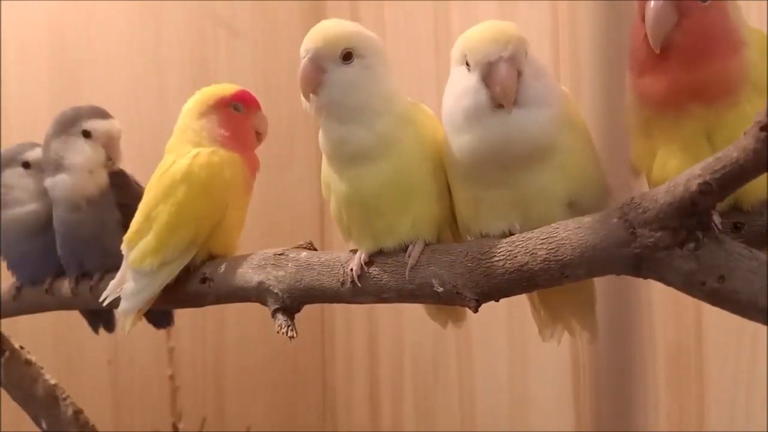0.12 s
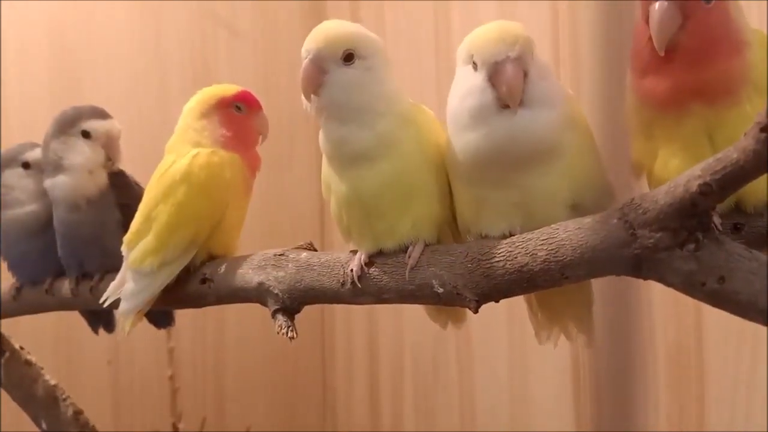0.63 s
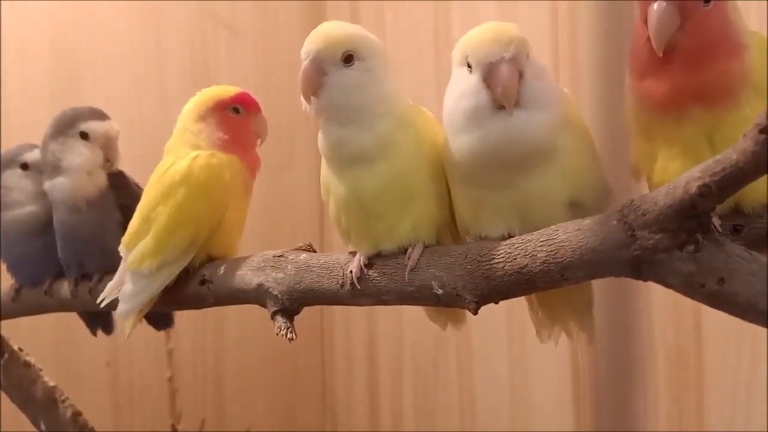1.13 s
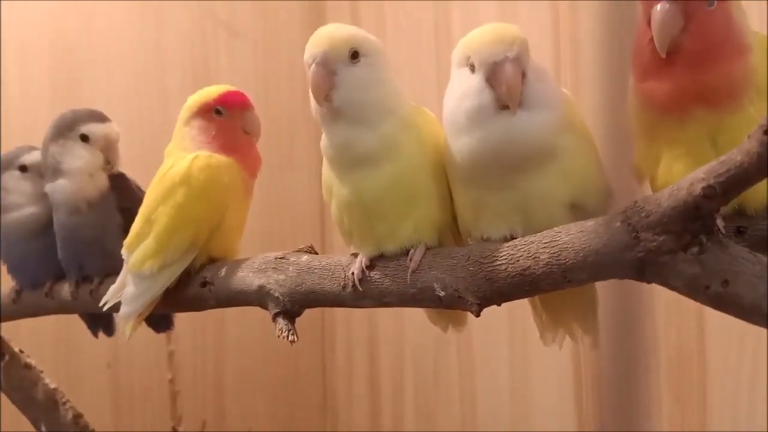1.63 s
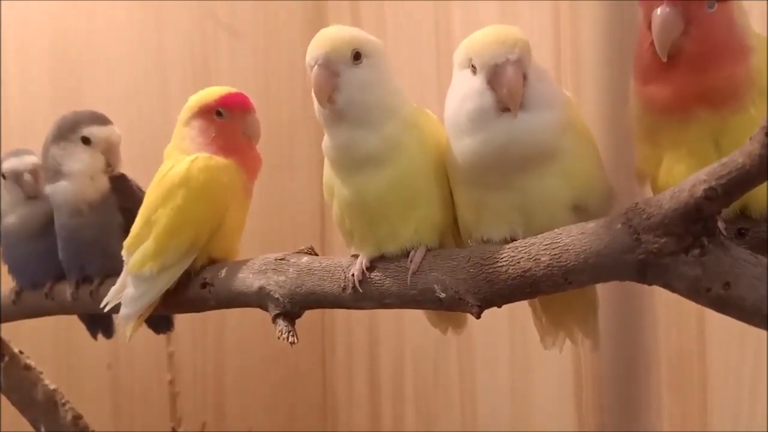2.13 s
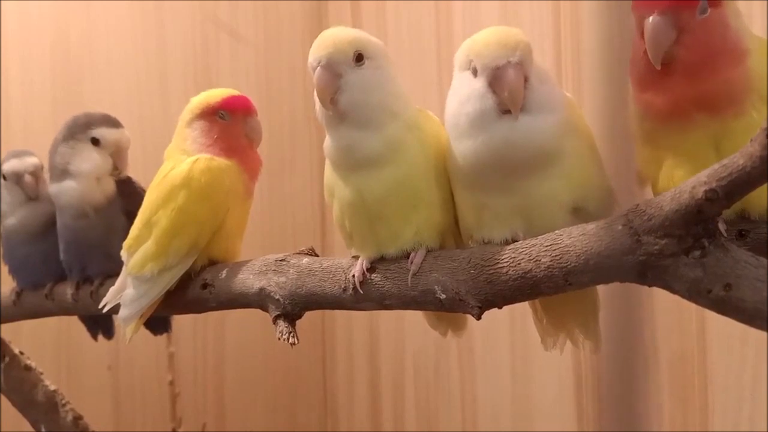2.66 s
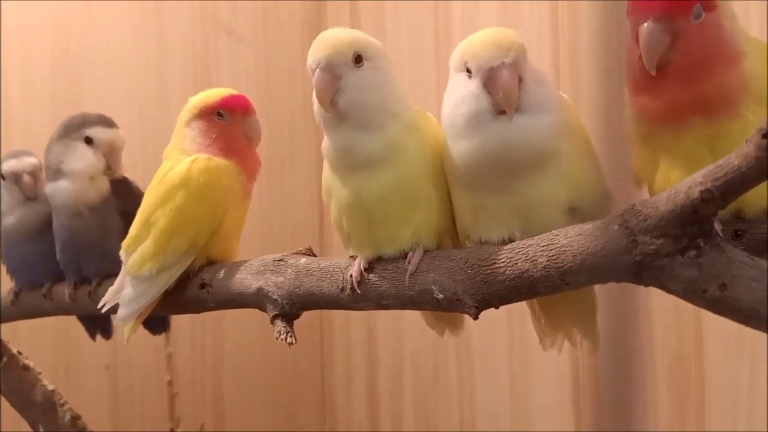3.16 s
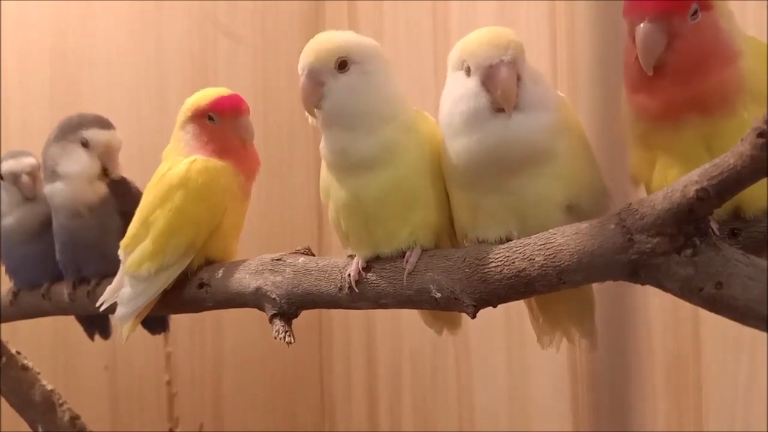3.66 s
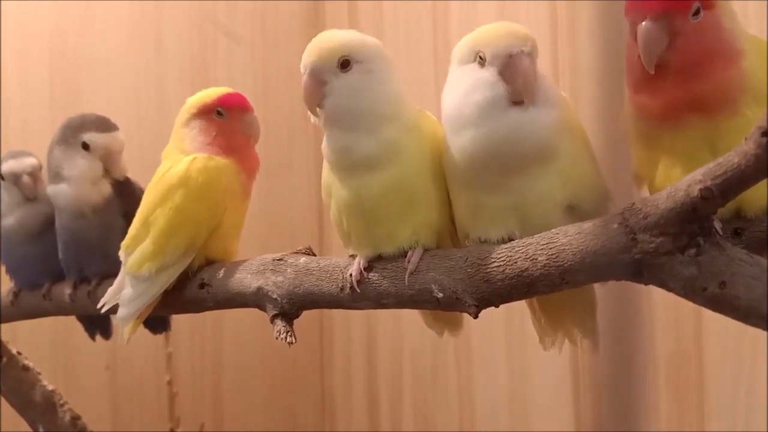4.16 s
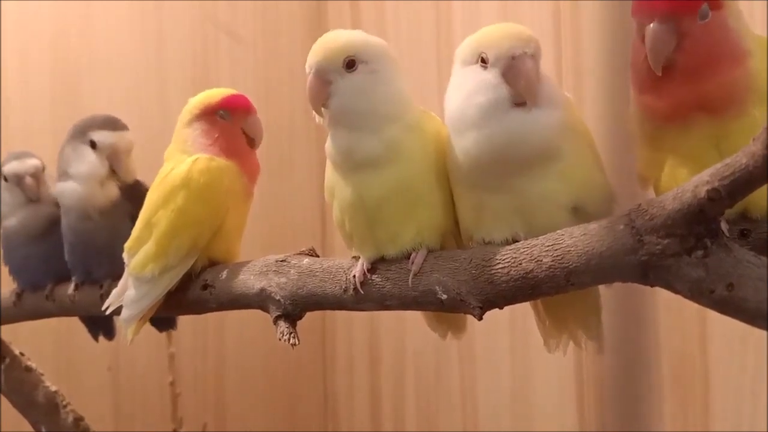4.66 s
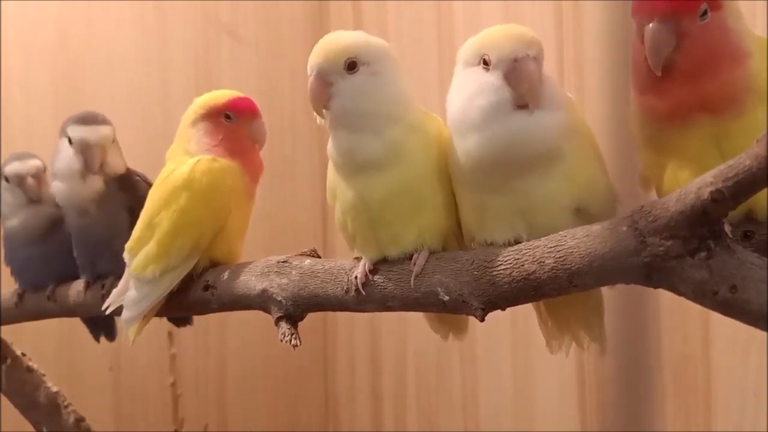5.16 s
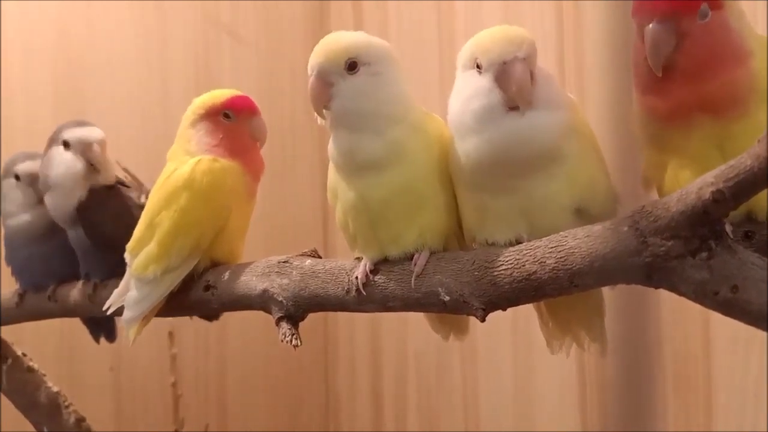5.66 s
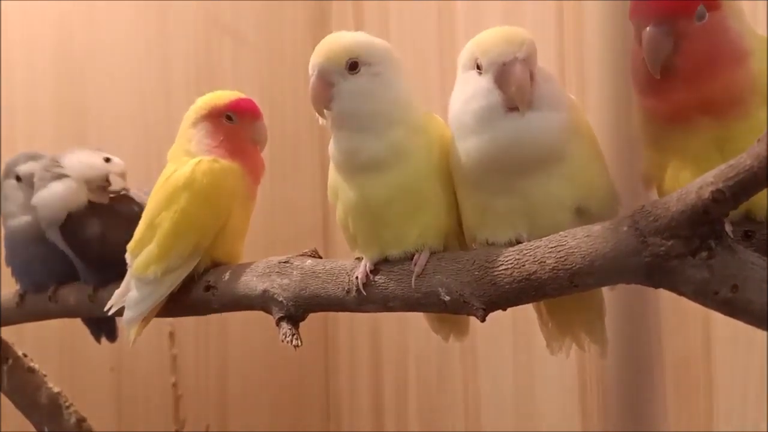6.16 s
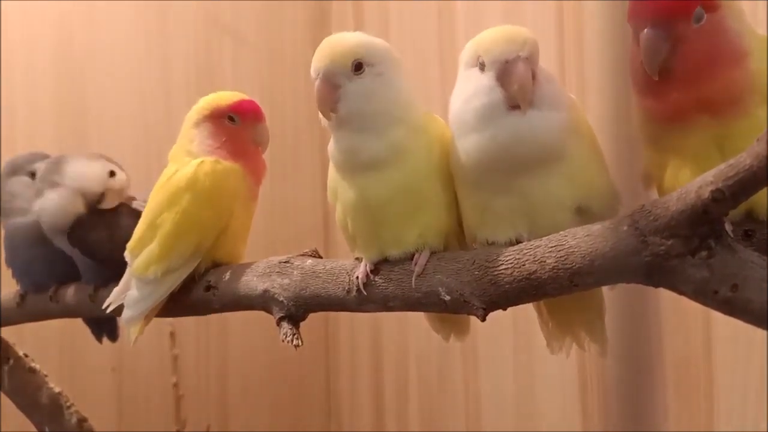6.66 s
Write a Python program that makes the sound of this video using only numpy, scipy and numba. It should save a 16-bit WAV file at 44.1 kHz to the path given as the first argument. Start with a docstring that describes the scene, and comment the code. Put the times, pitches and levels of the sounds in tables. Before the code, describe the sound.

An indoor aviary with short, lively echoes, low hum, soft hiss and blurred distant bird chatter throughout; a very faint insect-like buzz throbs high up. At 0 s a far rooster's rough crow is ending, dropping away by 0.5 s. Around 0.9 s a small parrot close on the left begins very quietly; from 1.2 to 2.4 s its clipped chirps grow louder and closer together. From 2.4 to 5.4 s it chatters rapidly, about eight syllables a second, mixing steep falling swoops, paired notes, rises and short harsh squawks. Thin, high gliding whistles answer faintly at the right, mostly 2.9-5.2 s, with a tiny feather rustle near 4.2 s. Faint rooster tones linger behind. The chatter thins and stops at about 5.9 s. A new distant crow comes in three syllables from 5.5 to 6.3 s, then other hoarse, fainter crows continue to the end near 6.8 s.

```python
"""An echoing aviary: a songbird close on the left pours out short falling and rising near-sine notes.
A thinner bird whistles higher up in gliding tones; roosters crow further off as stacks of shaken partials.
Filtered noise makes a brief rustle of feathers and a throbbing insect; random chirps make a far flock.
Shaped noise is the background: low hum, blurred far bird chatter near 2 kHz, and hiss.
Early echoes and a network of delay lines give the room."""
import sys
import numpy as np
from scipy import signal
from scipy.fft import rfft, irfft, next_fast_len
from scipy.io import wavfile
from scipy.ndimage import uniform_filter1d
from numba import njit

SR = 44100
rng = np.random.default_rng(int(sys.argv[2]) if len(sys.argv) > 2 else 0)


def ratio_of_db(decibels):
    """Turn decibels (scalar or array-like) into linear amplitude factors; 0 dB maps to 1."""
    return 10 ** (np.asarray(decibels, float) / 20)


def log_audio(samples):
    """Write samples as a 16-bit WAV file to the path given in sys.argv[1]."""
    # one column per channel
    frames = np.atleast_2d(samples).T
    # limit to full scale, then quantise
    limited = np.clip(frames, -1, 1)
    pcm = np.round(limited * 32767).astype(np.int16)
    wavfile.write(sys.argv[1], SR, pcm)


N = 299880


def unit(x):
    """Normalization: scale to an rms of 1."""
    return x / np.sqrt(np.mean(x ** 2))


def band(x, lo_hz, hi_hz):
    """Band limitation by a steep band-pass filter."""
    return signal.sosfilt(signal.butter(3, [lo_hz, hi_hz], "band", fs=SR, output="sos"), x)


def walk(rate_hz):
    """Low-passed noise: smooth chance of rms 1 that changes about rate_hz times a second."""
    width = int(SR / rate_hz)
    once = uniform_filter1d(rng.standard_normal(N), width)
    return unit(uniform_filter1d(once, width))


def notes(table, settle, attack, trill_hz=0., swing_hz=0., flutter_db=0., reach=0.98, sag_hz_per_s=0.):
    """Frequency modulation: near-sines glide quickly, then settle; a fast trill adds harsh sidebands.

    Rows: start_s, length_s, first_hz, last_hz, level_db; settle, attack and reach are relative times."""
    out = np.zeros(N + SR)
    starts = rng.uniform(0, 2 * np.pi, (len(table), 2))
    for (start_s, length_s, first_hz, last_hz, level_db), (tone_start, trill_start) in zip(table, starts):
        t = np.arange(int(length_s * SR)) / SR
        u = t / length_s
        glide = (1 - np.exp(-np.minimum(u / reach, 1) / settle)) / (1 - np.exp(-1 / settle))
        trill = swing_hz * np.sin(2 * np.pi * trill_hz * t + trill_start)
        pitch_hz = first_hz + (last_hz - first_hz) * glide - sag_hz_per_s * t + trill
        phase = tone_start + 2 * np.pi * np.cumsum(pitch_hz) / SR
        shape = np.sin(np.pi / 2 * np.clip(np.minimum(u / attack, (1 - u) / 0.17), 0, 1))
        # the octave grows as the glide settles
        octave = ratio_of_db(-36.5) * glide ** 2 * np.sin(2 * phase)
        i = int(start_s * SR)
        out[i:i + len(t)] += np.sqrt(2) * ratio_of_db(level_db) * shape * (np.sin(phase) + octave)
    if flutter_db:
        return out[:N] * ratio_of_db(flutter_db * walk(100))
    return out[:N]


def songbird():
    """Scaled contours: each syllable's pitch ratios multiply its key, in plain, steep or trilled notes."""
    # the song: start_s, syllable, key_hz, level_db
    song_rows = [(.735, "squawk", 2135, -74), (.91, "squawk", 2180, -56), (1.02, "short fall", 2045, -60),
                 (1.1, "short fall", 1580, -58), (1.186, "swoop", 1974, -45.5),
                 (1.415, "long pair", 1650, -44), (1.542, "fall", 1720, -36),
                 (1.725, "short fall", 1968, -49.5), (1.924, "rise", 2037, -34),
                 (2.023, "drop", 1544, -35.5), (2.139, "squawk", 2012, -32.5),
                 (2.364, "short pair", 1677, -36.5), (2.448, "swoop", 2008, -29),
                 (2.586, "stairs", 1822, -34), (2.742, "low stairs", 1350, -41),
                 (2.821, "short fall", 1703, -32), (2.914, "turn", 1916, -29.5),
                 (3.044, "drop", 1443, -30.5), (3.132, "squawk", 2027, -23),
                 (3.265, "long pair", 1648, -26), (3.383, "fall", 1805, -26.5),
                 (3.518, "short pair", 1688, -31), (3.6, "swoop", 1986, -26),
                 (3.734, "stairs", 1808, -30.5), (3.88, "fall", 1707, -28), (3.941, "climb", 1761, -32),
                 (4.042, "short pair", 1740, -29), (4.121, "swoop", 1947, -26),
                 (4.282, "long pair", 1649, -28), (4.398, "fall", 1742, -29),
                 (4.572, "short pair", 1708, -28.5), (4.652, "swoop", 1964, -25.5),
                 (4.81, "stairs", 1824, -33.5), (4.958, "low stairs", 1370, -38.5),
                 (5.037, "rise", 1984, -28.5), (5.131, "turn", 1849, -29.5), (5.283, "drop", 1445, -33.5),
                 (5.376, "squawk", 2032, -25), (5.462, "climb", 1734, -33), (5.59, "squawk", 2017, -42),
                 (5.687, "level", 1906, -24.5), (5.901, "squawk", 1945, -29)]
    # notes of each syllable: voice, after_s, length_s, first_ratio, last_ratio (times the key), step_db
    contours = { "swoop": [("steep", 0, .033, 1.34, .99, 0), ("plain", .038, .024, 1, 1.02, -1)],
                "squawk": [("harsh", 0, 0.031, 1.15, 1, 0)], "fall": [("plain", 0, .031, 1.3, 1, 0),
                ("harsh", .041, .012, 1.2, .74, -12)], "drop": [("plain", 0, .019, 1.29, 1, 0),
                ("harsh", .021, .012, 1.28, .9, -7)], "short fall": [("plain", 0, .027, 1.17, 1, 0),
                ("harsh", .034, .012, 1.1, .76, -12)], "level": [("plain", 0, 0.026, 1.03, 0.98, 0)],
                "rise": [("plain", 0, .017, .85, 1, 0), ("plain", .021, .013, .9, .8, -7)],
                "short pair": [("plain", 0, .021, 1.09, 1, 0), ("plain", .029, .017, .84, .92, -4)],
                "long pair": [("plain", 0, .023, 1.13, 1, 0), ("plain", .036, .037, .77, .9, -5)],
                "stairs": [("plain", 0, .012, 1.07, 1, 0), ("plain", .018, .032, .95, .78, -1)],
                "low stairs": [("plain", 0, .018, 1.36, 1.04, 0), ("plain", .02, .022, 1, .94, 0)],
                "turn": [("plain", 0, .016, .72, .72, -12), ("plain", .021, .025, 1.04, 1, 0),
                ("plain", .047, .015, .87, .83, -1.5)], "climb": [("plain", 0, .025, .8, .77, -4),
                ("plain", .035, .027, .94, 1, 0)], }
    voices = {"plain": [], "steep": [], "harsh": []}
    for start_s, name, key_hz, level_db in song_rows:
        for voice, after_s, length_s, first_ratio, last_ratio, step_db in contours[name]:
            note = (start_s + after_s, length_s, first_ratio * key_hz, last_ratio * key_hz, level_db + step_db)
            voices[voice].append(note)
    harsh = notes(voices["harsh"], 1.0, 0.13, trill_hz=191.6, swing_hz=160.0, flutter_db=-4.0)
    plain = notes(voices["plain"], 0.432, 0.25, flutter_db=3.0)
    steep = notes(voices["steep"], 0.411, 0.2)
    return plain + steep + harsh


def overtones(song, tone_db, hiss_db):
    """Phase multiplication: the song's envelope carries its fifth and sixth multiples and some hiss."""
    analytic = signal.hilbert(song)
    multiples = sum(np.cos(k * np.angle(analytic)) for k in range(5, 7))
    high = ratio_of_db(tone_db) * multiples + ratio_of_db(hiss_db) * rng.standard_normal(N)
    return band(np.abs(analytic) * high, 5400.0, 13000.0)


def whistler():
    """Exponential approach: whistles near their pitch in a fixed time and sag a little; slides climb."""
    # whistles: start_s, length_s, first_hz, held_hz (before the sag), level_db (before the flutter)
    whistle_rows = [(0.54, 0.029, 4530, 4650, -77), (0.793, 0.07, 3590, 3624, -81),
                    (0.96, 0.021, 4800, 4800, -81), (1.273, 0.054, 3640, 3805, -69.5),
                    (1.343, 0.028, 4700, 4570, -83), (1.692, 0.065, 4450, 4840, -76.5),
                    (2.875, 0.043, 4840, 4524, -60), (3.047, 0.088, 5080, 4596, -69),
                    (3.257, 0.046, 5640, 5326, -70), (3.546, 0.26, 4450, 4710, -64.5),
                    (3.783, 0.091, 4920, 5250, -75), (3.974, 0.062, 5350, 5205, -70),
                    (4.257, 0.045, 4550, 3970, -61.5), (4.305, 0.034, 4510, 4580, -65.5),
                    (4.429, 0.073, 3980, 3815, -54.5), (4.469, 0.075, 4320, 4480, -60),
                    (4.596, 0.054, 4740, 4802, -56.5), (4.786, 0.06, 4730, 4716, -62),
                    (5.82, 0.023, 4730, 4540, -72), (6.576, 0.049, 3630, 3860, -71.5)]
    # rising slides: start_s, length_s, top_hz, level_db (before the flutter)
    slide_rows = [(1.03, 0.1, 2920, -70), (4.147, 0.105, 3210, -56.5), (4.319, 0.11, 3083, -55),
                  (4.919, 0.11, 3710, -56), (5.1, 0.13, 3670, -55.5)]
    settle_s, slide_from_hz = 0.00886, 1500
    held = sum(notes([row], settle_s / row[1], 0.02, sag_hz_per_s=271) for row in whistle_rows)
    slides = [(start_s, length_s, slide_from_hz, top_hz, level_db)
              for start_s, length_s, top_hz, level_db in slide_rows]
    climbing = notes(slides, 1.76, 0.17, flutter_db=3.5, reach=0.86)
    return held * ratio_of_db(8.6 * np.minimum(walk(110), 1)) + climbing


def crow_syllable(start_s, length_s, top_hz, level_db):
    """Voice contour: a rough scoop up, an arched top that sags and fades, then a hoarse drop.

    Returns rows of start_s, pitch_hz, level_db, roughness."""
    scoop_hz, scoop_s, scoop_db, scoop_rough = 564, 0.029, -10.5, 0.7
    arch_s, arch_hz = 0.0725, 54.5
    sag_hz_per_s, fade_db_per_s, clear_rough = 180, -12.5, 0.35
    drop_s, drop_hz, drop_db, spent_rough = 0.038, -150, -11, 1
    hold_s = length_s - drop_s
    low_hz = top_hz - sag_hz_per_s * length_s
    low_db = level_db + fade_db_per_s * hold_s
    return [(start_s, scoop_hz, level_db + scoop_db, scoop_rough),
            (start_s + scoop_s, top_hz - arch_hz, level_db, clear_rough),
            (start_s + arch_s, top_hz, level_db, clear_rough),
            (start_s + hold_s, low_hz, low_db, clear_rough),
            (start_s + length_s, low_hz + drop_hz, low_db + drop_db, spent_rough)]


def crow(syllables, voice_db, breath_db):
    """Additive synthesis: roughness shakes the pitch, flutters each partial and adds breath noise."""
    t = np.arange(N) / SR
    knot_s, *columns = np.transpose(np.concatenate(syllables))
    pitch_hz, level_db, rough, *half_db = (np.interp(t, knot_s, column) for column in columns)
    sounding = sum((t >= rows[0][0] - .01) & (t < rows[-1][0]) for rows in syllables).clip(0, 1)
    shake = 1 + .004 * walk(30) + .014 * rough * walk(250)
    phase = 2 * np.pi * np.cumsum(pitch_hz * shake) / SR

    def flutter_db():
        return 3.2 * walk(26.4) + 12.9 * rough * np.minimum(walk(287), 1)

    # far under its top pitch the voice loses its overtones
    slack_db = -70 * np.maximum(.87 - pitch_hz / pitch_hz.max(), 0)
    stack = sum(ratio_of_db(partial_db + k * slack_db + flutter_db()) * np.sin((k + 1) * phase)
                for k, partial_db in enumerate(voice_db))
    if half_db:  # strong and weak cycles alternate: partials appear half-way between
        between_db = (np.array(voice_db[1:]) + voice_db[:-1]) / 2
        stack += sum(ratio_of_db(partial_db + half_db[0] + flutter_db()) * np.sin((k + 1.5) * phase)
                     for k, partial_db in enumerate(between_db))
    breath = rough * ratio_of_db(breath_db) * unit(band(rng.standard_normal(N), 300.0, 2300.0))
    return (stack + breath) * ratio_of_db(level_db) * uniform_filter1d(1. * sounding, size=600)


def roosters():
    """Harmonic spectra: five voices differ in contour, partial levels and breath."""
    # contours, one table a stretch: start_s, pitch_hz, level_db, roughness (0-1)
    shrill_crow, far_crow = [
        [(0, 746, -57.5, 0.94), (.25, 740.5, -60.5, 0.74), (.52, 738, -68, 0.49)],
        [(5.5, 699.2, -60.5, 0.617), (5.95, 722.2, -61, 0.46), (6.2, 716.3, -50, 0.41), (6.4, 717, -82, 0.82)],
        [(6.46, 677, -59, 0.48), (6.62, 681, -56, 0.41), (6.8, 692.7, -53.5, 0.57)],
    ], [
        [(3.25, 676, -62.5, 0.4), (3.55, 667.4, -66.5, 0.74)],
        [(3.6, 743.7, -60, 0.49), (4.25, 735.3, -64, 0.7), (4.9, 679, -65.5, 0.59)],
    ]
    # broken voices, the same with one more column: half_db (partials half-way between)
    end_crow, hoarse_crow = [
        [(0, 782, -53, 0.55, -2), (.14, 769.2, -50.5, 0.69, -8), (.25, 715.7, -50.5, 0.02, 3),
         (.44, 685, -50.5, 0.42, -1), (.495, 530, -42.5, 0.34, -19)],
    ], [
        [(0, 479, -45, 0.44, -17), (.17, 459.6, -56, 0.3, -7)],
        [(6.38, 600.2, -59.5, 0.79, -7), (6.55, 552, -56, 0.58, -9.5), (6.61, 544.2, -59, 0.88, 11),
         (6.68, 534.3, -54.5, 0.53, 11), (6.8, 547.3, -49.5, 0.21, -4)],
    ]
    # a fresh crow, one row a syllable: start_s, length_s, top_hz, level_db
    new_crow = [(5.459, 0.18, 746.3, -47), (5.709, .19, 813.3, -41), (5.922, .36, 789.3, -42.5)]
    # partial_db at 1, 2, 3 .. times the pitch, before flutter and slack
    end_voice, new_voice = [4, -0.5, 10, -16, -37, -33, -40, -58, -35, -29, -22.5], [0, 4.45, -31]
    shrill_voice, hoarse_voice = [0.5, 10, -8, 0.5, -19.5, -28, -20, -17.5, -18], [-1.5, -1, -1, -15]
    return [crow(end_crow, end_voice, -2.4),
            crow([crow_syllable(*row) for row in new_crow], new_voice, -13.5),
            crow(shrill_crow, shrill_voice, -17.0),
            crow(hoarse_crow, hoarse_voice, -10),
            crow(far_crow, [0], -27)]


def rustle():
    """Amplitude-modulated noise: feathers give a bright grainy band that swells and dies."""
    # one rustle: start_s, length_s, level_db (before swell and grain)
    start_s, length_s, level_db = (4.23, .11, -64)
    u = np.clip((np.arange(N) / SR - start_s) / length_s, 0, 1)
    noise = unit(band(rng.standard_normal((2, N)), 4600.0, 9900.0))
    return noise * np.sin(np.pi * u) * ratio_of_db(level_db + 3.9 * walk(150))


def insect(throb_hz, pulse_hz, level_db):
    """Amplitude modulation: wing strokes ring a band near 7 kHz in steady throbs of a few pulses."""
    t = np.arange(N) / SR
    throb = (.5 + .5 * np.cos(2 * np.pi * throb_hz * (t - .96) + .3 * walk(2))) ** 0.5
    pulses = 1 + 0.38 * np.cos(2 * np.pi * pulse_hz * t + 2 * walk(20))
    ring = band(rng.standard_normal((2, N)), 6700.0, 7550.0)
    return unit(ring) * throb * pulses * ratio_of_db(level_db)


def flock(count, level_db, spread_db):
    """Random superposition: short trilled chirps at chance moments, pitches and levels."""
    r = rng.uniform(0.0012, 1, (count, 5))
    start_s = r[:, 0] * N / SR
    length_s = 0.0173 + 0.0065 * r[:, 1]
    first_hz = 1750 + 800 * r[:, 2]
    last_hz = first_hz * (0.9 + 0.318 * r[:, 3])
    chirp_db = level_db - spread_db * r[:, 4]
    table = np.transpose([start_s, length_s, first_hz, last_hz, chirp_db])
    return notes(table, .5, .4, trill_hz=170., swing_hz=260.)


def background():
    """Partly coherent noise: low hum, blurred far bird chatter near 2 kHz, and hiss; most alike in the bass."""
    # spectrum of the background: frequency_hz, density_db (relative, per Hz)
    spectrum = np.transpose([(26, -48), (45, -12), (300, -5), (1200, -15.5), (2040, -3), (4240, -26.5),
                             (7230, -30.5), (9680, -35.5), (13600, -42), (15000, -51)])
    # left-right likeness: frequency_hz, correlation (0-1)
    likeness = np.transpose([(30, 0.4), (100, 1), (400, 0.52), (2000, 0.016)])
    log_hz = np.log(np.fft.rfftfreq(N, 1 / SR) + 1)
    like = np.clip(np.interp(log_hz, np.log(likeness[0]), likeness[1]), 0, 1)
    colour = ratio_of_db(np.interp(log_hz, np.log(spectrum[0]), spectrum[1]))
    mid, side = rfft(rng.standard_normal((2, N))) * colour * np.sqrt([1 + like, 1 - like])
    return unit(irfft(np.array([mid + side, mid - side]), N)) * ratio_of_db(-53)


def place(x, pan_db, lead_s):
    """Level and time differences: the left microphone is pan_db louder and lead_s earlier."""
    size = next_fast_len(N + 4096)
    turn = np.exp(1j * np.pi * np.fft.rfftfreq(size, 1 / SR) * lead_s)
    shifted = irfft(rfft(x, size) * np.array([turn, 1 / turn]), size)[:, :N]
    return ratio_of_db([[pan_db / 2], [-pan_db / 2]]) * shifted


def early_echoes(direct):
    """Discrete reflections: delayed copies of the near birds with a level for each side."""
    # echoes: delay_s, left_db, right_db
    reflections = [(.0034, -8, -9.5), (.0052, -8.5, -1), (.0113, -8.5, -2.5)]
    return sum(ratio_of_db([[left_db], [right_db]]) * np.roll(direct, int(delay_s * SR), axis=1)
               for delay_s, left_db, right_db in reflections)


@njit
def walls(x, lags, gain, damp):
    """Feedback delay network: eight lines feed each other, duller on every round."""
    line, soft, out = np.zeros((8, 4096)), np.zeros(8), np.zeros((2, len(x)))
    for i in range(len(x)):
        total = 0.
        for k in range(8):
            soft[k] += (1 - damp) * (gain[k] * line[k, (i - lags[k]) & 4095] - soft[k])
            total += soft[k]
            # lines alternate between left and right, with changing sign
            out[k % 2, i] += soft[k] * (1 - 2 * (k // 2 % 2))
        for k in range(8):
            line[k, i & 4095] = x[i] + 1e-18 + soft[k] - total / 4
    return out


def scene():
    """Superposition: near birds with early echoes, roosters and a far flock.

    All these birds reach the walls, the thin whistles most strongly."""
    song = songbird()
    edge = overtones(song, tone_db=-47.0, hiss_db=-43.5)
    thin = whistler()
    crows = roosters()
    far = flock(count=200, level_db=-54.5, spread_db=18.0)

    direct = place(song, 8.7, 0.00033) * ratio_of_db(-0.5)
    direct = direct + place(thin, -19.0, -0.00011) * ratio_of_db(-1.0)
    direct = direct + place(edge, -7.0, -0.000288)
    yard = place(crows[0], 0.74, 0.00017) + place(crows[1], -0.79, -0.00011)
    yard = yard + place(sum(crows[2:]), 0.28, -0.000099)

    send = song + ratio_of_db(6.5) * edge + ratio_of_db(13.5) * thin + ratio_of_db(3.0) * sum(crows) + ratio_of_db(11) * far
    lags = (409 * 1.27 ** np.arange(8)).astype(np.int64)  # samples
    t60_s = 0.45  # time to fall by 60 dB, before the damping
    tail = walls(send, lags, ratio_of_db(-60 * lags / SR / t60_s), 0.033)

    birds = direct + early_echoes(direct) + yard + ratio_of_db(-11.0) * tail + place(far, 15.0, 0.00021)
    return birds + insect(throb_hz=9.75, pulse_hz=59., level_db=-70.5) + rustle() + background()


def low_pass(x):
    """Removes everything above the highest recorded frequency."""
    return signal.sosfilt(signal.butter(12, 15450, fs=SR, output="sos"), x)


def record(dry):
    """Direct-current offset: the converter adds a small constant to the mix."""
    mix = dry + 0.001
    return low_pass(mix)


dry = scene()
out = record(dry)
log_audio(out)
```